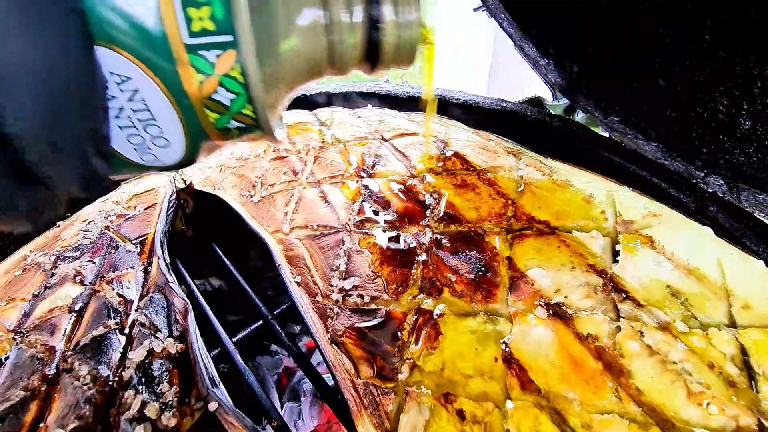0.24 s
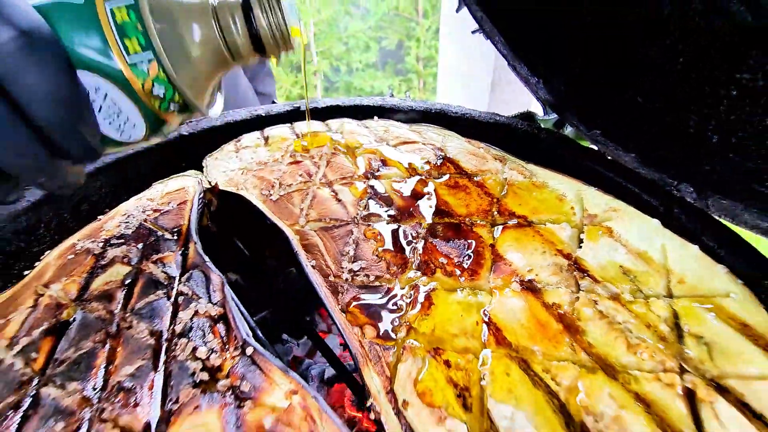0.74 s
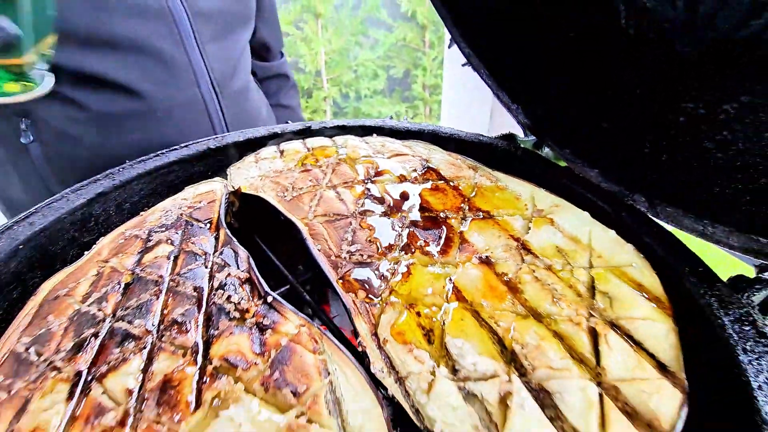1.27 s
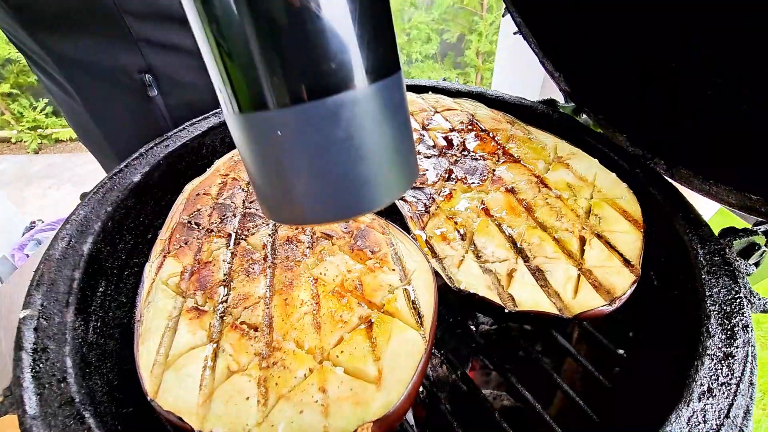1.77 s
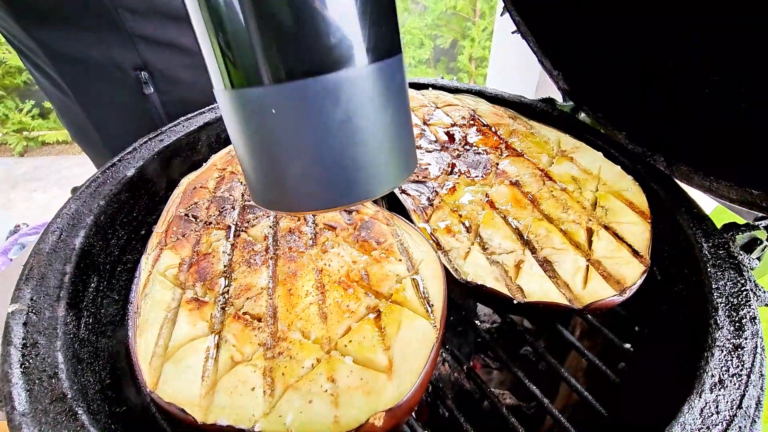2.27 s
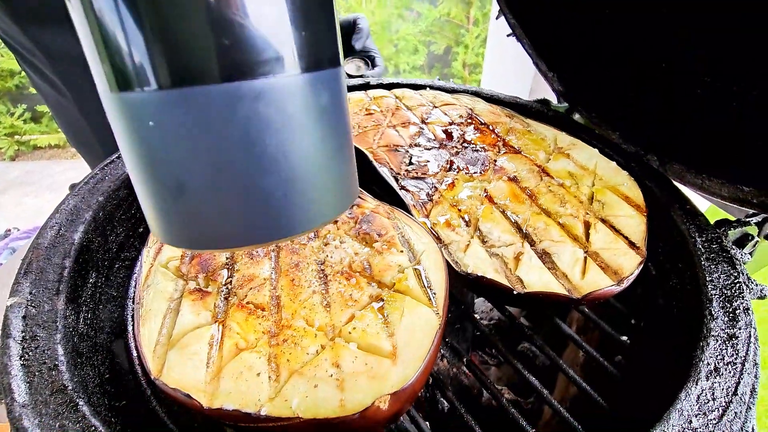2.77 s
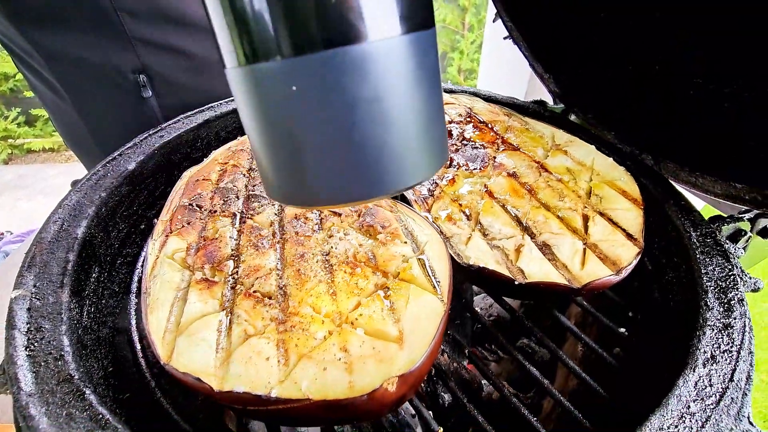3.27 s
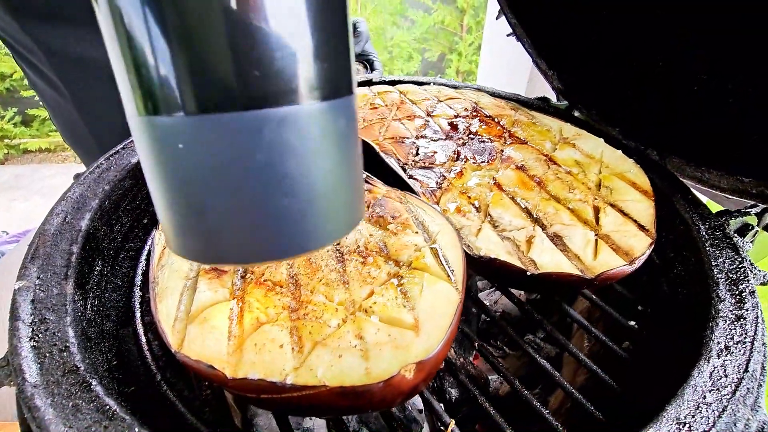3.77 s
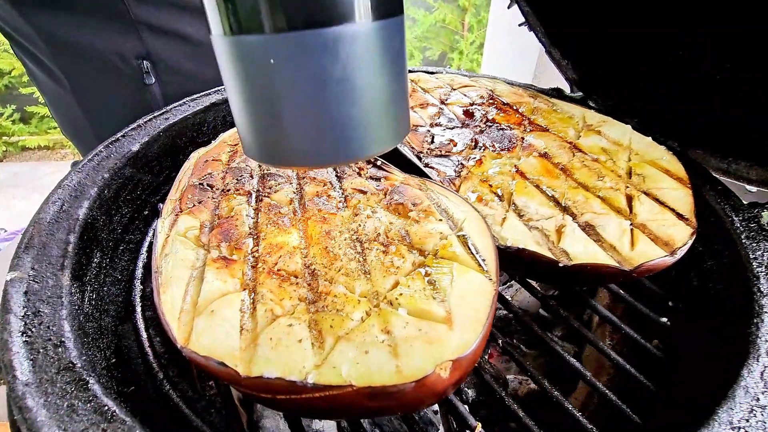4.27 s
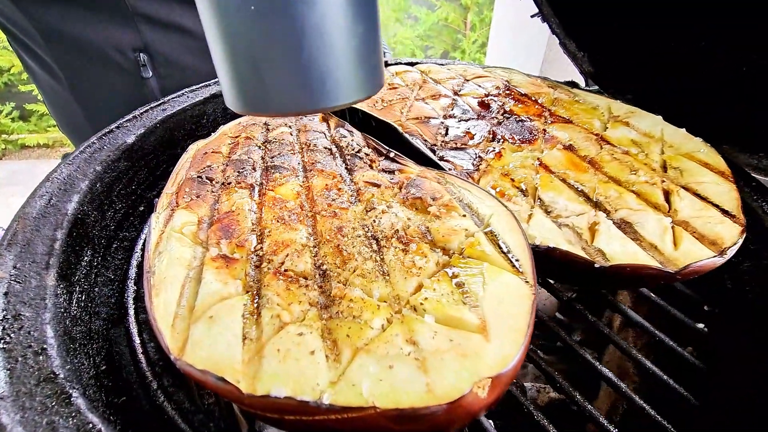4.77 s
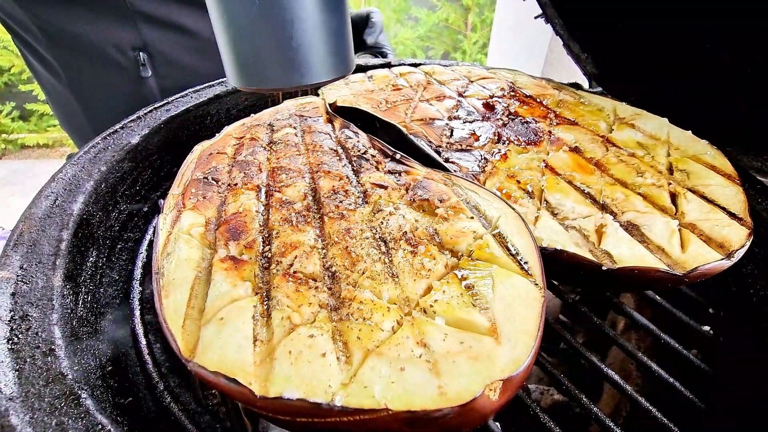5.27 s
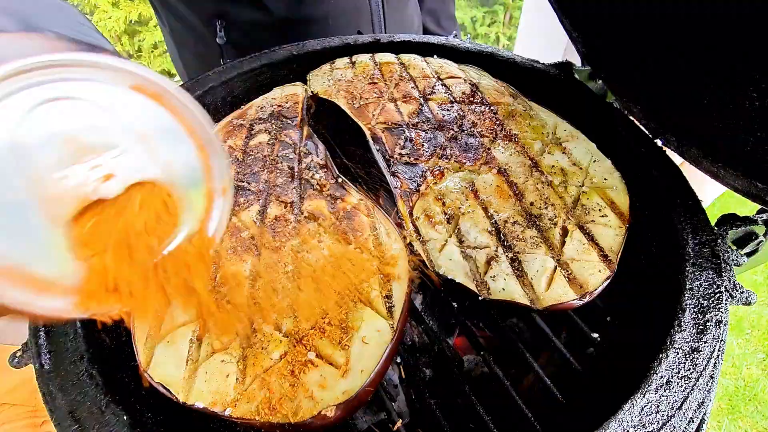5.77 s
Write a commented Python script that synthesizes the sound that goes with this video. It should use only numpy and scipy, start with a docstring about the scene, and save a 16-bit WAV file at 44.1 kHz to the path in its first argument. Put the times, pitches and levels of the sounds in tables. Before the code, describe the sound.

Outdoors by an open grill, soft low air and rumble come first, with a faint tick. A small electric pepper mill then switches on sharply, its whining motor, plastic gear rattle and crisp grinding rasp running steadily for over four seconds. Peppercorns crack in brief snaps, and the pitch dips as the burr bites. It stops abruptly, leaving faint sizzle and a light click. Close microphone, dry.

```python
"""Pepper mill over a grill

A battery pepper mill runs for a little over four seconds above an open charcoal grill in a garden.
Its motor whines in tones locked to a shaft that sags under load; tooth clicks rattle the plastic housing.
Clumps of tiny snaps make the rasp of the burr, and short bursts of noise are corns cracking.
Around it, filtered noise gives a low rumble, fine clicks a faint sizzle, damped rings a few light ticks."""
import sys
import numpy as np
from scipy import signal
from scipy.fft import rfft, irfft
from scipy.io import wavfile
from scipy.ndimage import uniform_filter1d

SR = 44100
rng = np.random.default_rng(int(sys.argv[2]) if len(sys.argv) > 2 else 0)


def log_audio(samples):
    """Write samples as a 16-bit WAV file to the path given in sys.argv[1]."""
    # one column per channel
    frames = np.atleast_2d(samples).T
    # limit to full scale, then quantise
    limited = np.clip(frames, -1, 1)
    pcm = np.round(limited * 32767).astype(np.int16)
    wavfile.write(sys.argv[1], SR, pcm)


N = 266364
T = np.arange(N) / SR  # time of every sample, s


def amp(db):
    """Turns decibels into a plain multiplier."""
    return 10 ** (np.asarray(db) / 20)


def unit(x):
    """Scales a sound to an average strength (rms) of 1."""
    return x / np.sqrt(np.mean(x ** 2) + 1e-20)


def curve(rows, axis=1):
    """Draws straight lines through one column of a table of times."""
    rows = np.asarray(rows)
    return np.interp(T, rows[:, 0], rows[:, axis])


def colour(x, points):
    """Gives a sound the listed spectrum, with a filter of energy 1 that never rings ahead of its input."""
    size = 8192
    hz, db = np.transpose(points)
    log_hz = np.log(abs(np.fft.fftfreq(size, 1 / SR)) + 1)
    log_gain = np.log(amp(np.interp(log_hz, np.log(hz), db)))
    minimum_phase = np.exp(np.conj(signal.hilbert(log_gain)))
    taps = np.fft.ifft(minimum_phase).real[:size // 2]
    return signal.oaconvolve(x, taps / np.linalg.norm(taps))[:len(x)]


def wander(hz):
    """Random drift of rms 1 whose movements weaken above the given rate."""
    f = np.fft.rfftfreq(N, 1 / SR)
    spectrum = rfft(rng.standard_normal(N)) / (1 + (f / hz) ** 2)
    return unit(irfft(spectrum, N))


def ring(x, hz, width):
    """A fixed resonance: it answers most strongly near one frequency."""
    b, a = signal.iirpeak(min(hz, SR / 2 - 1), hz / width, SR)
    return signal.lfilter(b, a, x)


def double_ring(x, hz, width):
    """The same resonance twice in a row, for steeper sides, at rms 1."""
    return unit(ring(ring(x, hz, width), hz, width))


def grains(per_s, spread_db):
    """Random clicks of uneven size and either sign."""
    size = amp(spread_db * np.minimum(rng.exponential(1, N), 4))
    sign = rng.choice([-1, 1], N)
    return size * sign * (rng.random(N) < per_s / SR)


def patches(x, db, count):
    """The colour flickers in patches about 500 Hz wide and count frames of 1.5 ms long."""
    z = signal.stft(x, nperseg=256, noverlap=192)[2]
    field = rng.standard_normal(z.shape)
    for axis, size in enumerate([3, count]):  # across frequency, then along time
        field = uniform_filter1d(uniform_filter1d(field, size, axis), size, axis)
    flickering = z * amp(db * unit(field))
    return unit(signal.istft(flickering, nperseg=256, noverlap=192)[1][:len(x)])


# colour of the wash of outdoor air: [f/Hz, relative level/dB]
AIR_COLOUR = [(60, 1), (100, -11.5), (200, -12.5), (320, -11), (450, -14), (600, -12.5), (780, -17),
              (1000, -19.5), (1250, -30.5), (1700, -37.5), (2500, -50), (5000, -89.5)]
# rise and fall of the rumble, before its trim: [t/s, level/dB]
RUMBLE_LEVEL = [(0, -61.5), (.63, -69), (.7, -57), (1.4, -63.5), (1.7, -57), (3.55, -53), (4.3, -59),
                (5.8, -60.5), (5.95, -68.5)]
# colour of the rumble: [f/Hz, relative level/dB]
RUMBLE_COLOUR = [(25, -26), (40, -17), (58, -3), (72, -2.5), (86, 1.5), (105, -4), (130, -3), (200, -5.5),
                 (300, -25), (600, -59.5)]
# colour of the sizzle: [f/Hz, relative level/dB]
SIZZLE_COLOUR = [(1200, -30), (2000, -11.5), (3200, -10), (4900, -6), (6200, -11), (8000, -14.5),
                 (12000, -12), (14000, -9), (15200, -2), (15800, -3.5)]
# rise and fall of the sizzle: [t/s, level/dB]
SIZZLE_LEVEL = [(0, -71.5), (1.44, -70), (5.82, -59), (6.04, -67)]
AIR_DB, AIR_FALL_DB_PER_S = -59.5, 0.36  # wash at the beginning, and how fast it eases


def garden(rumble_trim_db=-1, low_edge_hz=170):
    """Distant wash and lumpy rumble from noise, with fine clicks for the sizzle of oil on the grill."""
    high_pass = signal.butter(2, low_edge_hz, "high", fs=SR, output="sos")
    wash = signal.sosfilt(high_pass, colour(rng.standard_normal(N), AIR_COLOUR))
    air = amp(AIR_DB - AIR_FALL_DB_PER_S * T + 1.5 * wander(3.4)) * unit(wash)
    rumble = amp(curve(RUMBLE_LEVEL) + rumble_trim_db) * colour(rng.standard_normal(N), RUMBLE_COLOUR)
    spits = patches(grains(12000, 2.2), 2.3, count=40)
    sizzle = amp(curve(SIZZLE_LEVEL)) * colour(spits, SIZZLE_COLOUR)
    return air + rumble + sizzle


# light handling ticks: [t/s, level/dB, f/Hz, width of each resonance/Hz, time to fade by 60 dB/s]
TICKS = [(.955, -67, 2460, 200, .16), (.955, -63, 3500, 1700, .07), (.96, -73, 3250, 1100, 0.86),
         (1.037, -67, 14500, 3000, .1), (5.899, -57, 6800, 2500, .015), (5.9111, -47, 6830, 2500, 0.0062),
         (5.9113, -47, 13000, 5000, .005), (5.914, -63, 6400, 1800, .12), (5.94, -66, 6500, 2500, .015)]


def ticks():
    """Short damped rings of things handled beside the grill, made from narrow noise."""
    out = np.zeros(N)
    for s, db, hz, width, t60 in TICKS:
        fading_db = db - 60 * np.maximum(T - s, 0) / t60
        out += (T >= s) * amp(fading_db) * double_ring(rng.standard_normal(N), hz, width)
    return out


# peppercorns that break: [t/s, level/dB, length of the fracture/s, pitch of the snap f/Hz]
CRACKS = [(2.1554, -19.5, .0012, 7590), (2.3094, -16.8, .0011, 3400), (2.3123, -21.5, 0.00078, 1200),
          (2.4977, -18.5, .0014, 2600), (2.5006, -17.5, 0.00098, 4700), (3.8953, -16.7, .002, 5000),
          (3.8968, -21, 0.00099, 1100), (4.3944, -16.5, .0013, 3900), (4.3967, -24, .001, 2000),
          (5.2673, -19.5, 0.00069, 4600), (5.4901, -18.3, .0012, 4700), (5.4923, -23, 0.00099, 7300)]
# colour of the breaking burst: [f/Hz, relative level/dB]
CRACK_COLOUR = [(300, -24), (900, -8), (2400, -0.5), (3400, -8.5), (4900, 1.5), (5900, -4.5), (7800, -1.5),
                (9700, -4), (12200, 0.5), (14000, -7), (15400, -3)]


def cracks(tail_db=-13, tail_s=0.0066, snap_db=-6, snap_width_hz=900, echo_db=-13, echo_s=0.0067):
    """A corn splits in a brief burst with its own pitch; crumbs follow and a nearby surface throws it back."""
    age, out = T[:SR // 20], np.zeros(N)
    for s, db, length, hz in CRACKS:
        fracture = np.exp(-(age / length) ** 4)
        crumbs = amp(tail_db) * np.exp(-age / tail_s)
        force = amp(db) * (fracture + crumbs)
        burst = colour(force * rng.choice([-1, 1], len(age)), CRACK_COLOUR)
        snap = ring(force * rng.choice([-1, 1], len(age)), hz, snap_width_hz)
        snap *= np.sqrt(SR / np.pi / snap_width_hz)  # makes up for the narrow band
        crack = (burst + amp(snap_db) * snap) / np.hypot(1, amp(snap_db))
        out[round(s * SR):][:len(age)] += crack
    return out + amp(echo_db) * np.interp(T - echo_s, T, out)


ON, OFF = 1.4445, 5.803  # the motor runs between these times, s


def motor_switch(start_s=0.0072, stop_s=0.009):
    """The motor's sound ramps up from 0 to 1 as it starts and back down as it stops."""
    rise = np.clip((T - ON) / start_s + .5, 0, 1)
    fall = np.clip((OFF - T) / stop_s + .5, 0, 1)
    return rise * fall


# how far the mill is drawn back: [t/s, share 0 to 1]
DRAWN_BACK = [(1.4, 0.3), (1.8, 0.06), (3.7, 0.03), (4.1, 0.9), (5.0, 1), (5.8, 0.99)]


def drawn_back():
    """The mill's place over time: 0 held close, 1 drawn back."""
    return np.clip(curve(DRAWN_BACK), 0, 1)


# the burr bites on corns until they give way:
# [t of giving way/s, build-up/s, drag on the shaft/Hz, extra noise level/dB]
BITES = [(1.525, .09, 28.8, 4), (1.571, .04, 9.1, 3.5), (1.743, .124, 8.5, 1.7), (1.93, .04, 3, 1),
         (2.025, .14, 13.7, 2), (2.127, .062, 10.2, 1.5), (2.31, 0.065, 17.9, 2), (2.51, 0.076, 20.2, 3.6),
         (2.637, .12, 5.4, 1.5), (2.793, 0.057, 0.51, 0.5), (3.15, .12, 12.7, 1.2),
         (3.358, 0.087, 15.3, 1.3), (3.87, .08, 13, 2.5), (3.975, .1, 24.8, 3), (4.286, 0.12, 11.3, 1.5),
         (4.407, 0.064, 17, 3.5), (4.523, .057, 3.95, 2), (4.68, .14, 13, 0.9), (4.85, .11, 10.8, .6),
         (4.98, 0.099, 13, 0.8), (5.138, .115, 27.1, 2.5), (5.342, .127, 16.5, 2), (5.475, .115, 23.3, 3.3),
         (5.75, .2, 4.07, 0.4)]
FREE_HZ, INERTIA_S = 275.3, .05  # turns per s of the unloaded shaft; lag of its speed behind the load
RELEASE_S = .029  # the force of a bite dies away this fast


def bites():
    """Each bite builds and lets go; gives the shaft speed, which sags a little later, and the extra noise."""
    drag, extra_db = np.zeros(N), np.zeros(N)
    for s, build, drag_hz, db in BITES:
        force = np.exp(-np.where(T < s, ((T - s) / build) ** 2, (T - s) / RELEASE_S))
        drag += drag_hz * force
        extra_db += db * force
    keep = np.exp(-1 / (INERTIA_S * SR))
    lagging_drag = signal.lfilter([1 - keep], [1, -keep], drag)
    return FREE_HZ - lagging_drag, extra_db


# levels between bites as the mill is moved about, before each part's trim:
# [t/s, gear rattle level/dB, burr rasp level/dB, gear strain level/dB]
BETWEEN_BITES = [(1.445, -35.7, -34.5, -46), (2.0, -35.5, -34, -43.5), (2.8, -35.0, -32, -40.5),
                 (3.6, -35, -32.9, -42), (4.05, -36, -33.5, -43), (4.3, -36.9, -32.5, -42.5),
                 (4.9, -36, -33, -41.5), (5.4, -38, -35.5, -43.5), (5.78, -37.5, -34, -46)]
BURR_GROWTH, STRAIN_GROWTH = 0.83, 2.15  # dB of rasp and of gear strain per dB of extra noise


def working_levels(extra_db):
    """Rattle, rasp and strain all grow with a bite, each at its own rate."""
    rattle_db = curve(BETWEEN_BITES) + extra_db
    rasp_db = curve(BETWEEN_BITES, axis=2) + BURR_GROWTH * extra_db
    strain_db = curve(BETWEEN_BITES, axis=3) + STRAIN_GROWTH * extra_db
    return rattle_db, rasp_db, strain_db


# colour of the burr in its chute with the mill held close: [f/Hz, relative level/dB]
CHUTE_NEAR = [(1500, -25), (3100, -4.5), (4900, -9), (5800, -16), (6900, -6.5), (7600, -2.5), (8700, 0.5),
              (9700, -10.5), (11200, -7.5), (12700, -2.5), (13950, -8), (14900, 1), (15700, 1)]
# the same with the mill drawn back: [f/Hz, relative level/dB]
CHUTE_FAR = [(1500, -28.5), (3100, -15.5), (4500, -5), (5500, -2), (6600, -4), (7500, -1.5), (8700, -0.5),
             (9700, -6), (10700, -3), (11500, -4.5), (12900, -0.5), (13950, -8), (14900, 4.5), (15700, 2.5)]


def burr(turns, rasp_db, back, trim_db=0.5, depth=0.11, clump_db=0.6, patchy_db=1.3):
    """Pepper crumbles between the cones in clumps of tiny snaps that sound through the chute."""
    once_a_turn = np.exp(depth * np.cos(2 * np.pi * turns))
    snaps = unit(grains(11000, 2.0) * once_a_turn * amp(clump_db * wander(83)))
    snaps = patches(snaps, patchy_db, count=24)
    near, far = colour(snaps, CHUTE_NEAR), colour(snaps, CHUTE_FAR)
    return amp(rasp_db + trim_db) * ((1 - back) * near + back * far)


# colour of the treble layer that differs between left and right: [f/Hz, relative level/dB]
TREBLE_COLOUR = [(3500, -61), (5000, -23), (6200, 5), (8200, -11), (10500, 4), (14000, -2.5), (15500, 1.5)]


def treble_difference(rasp_db, back, running, grain_db=-12, crack_db=-10):
    """Separate treble grains and crack bursts, opposite in left and right, fading out as back rises to 1."""
    treble_grains = running * amp(rasp_db + grain_db) * colour(unit(grains(11000, 2.4)), TREBLE_COLOUR)
    crack_bursts = amp(crack_db) * colour(cracks(), TREBLE_COLOUR)
    return (1 - back) * (treble_grains + crack_bursts)


def knocks(turns, scatter_db):
    """One uneven knock each turn."""
    new_turn = np.diff(np.floor(turns), prepend=0) > 0
    size = amp(scatter_db * rng.standard_normal(N))
    return unit(new_turn * size * rng.choice([-1, 1], N))


def chatter(turns, depth=0.18, knock=.14, second_knock=0.17):
    """Dense tooth clicks that swell once a shaft turn, with knocks from shaft and gear wheel."""
    wheel_turns = 1.512 * turns
    clicks = unit(grains(12000, 1.4) * np.exp(depth * np.cos(2 * np.pi * turns)))
    return unit(clicks + knock * knocks(turns, 4.7) + second_knock * knocks(wheel_turns, 3))


# colour of the plastic housing struck by the gears: [f/Hz, relative level/dB]
HOUSING = [(100, -24), (250, -15), (400, -12.5), (600, -11.5), (850, -4), (1150, -2.5), (1500, -1.5),
           (1900, -3.5), (2250, -2.5), (2700, -4.5), (3400, -3), (4700, -1.5), (5700, -11), (8000, -24)]
# housing resonances that ring as the load rises: [f/Hz, half the width of each resonance/Hz, relative level/dB]
STRAIN = [(1917, 320, -2.5), (4250, 500, -6)]


def gears(turns, rattle_db, strain_db, rattle_trim_db=-1.15, strain_trim_db=-5.5, patchy_db=1.5):
    """The chatter shakes the housing, whose resonances ring harder as the load rises."""
    drive = chatter(turns)
    ringing = unit(sum(amp(db) * double_ring(drive, hz, 2 * width) for hz, width, db in STRAIN))
    body = patches(colour(chatter(turns), HOUSING), patchy_db, count=60)
    return amp(rattle_db + rattle_trim_db) * body + amp(strain_db + strain_trim_db) * ringing


FOOD_ECHO_DB = -14.5
ECHO_S, ECHO_LIFT_S = 0.000989, .0005  # delay held close; added delay when fully drawn back


def food_echo(grinding, back):
    """The food below throws the grinding back, later when the mill is drawn back."""
    return amp(FOOD_ECHO_DB) * np.interp(T - ECHO_S - ECHO_LIFT_S * back, T, grinding)


# harsh bands as the mill starts, from the brushes and the gear teeth:
# [f/Hz, width of each resonance/Hz, level/dB, length/s]
START_UP = [(15200, 2200, -37, .07), (4300, 750, -38, .13)]


def start_up():
    """The brushes fizz and the teeth scrape, as bands of noise, while the motor takes up the first load."""
    out = np.zeros(N)
    for hz, width, db, length in START_UP:
        fade = np.exp(-((T - ON) / length) ** 4)
        out += amp(db) * fade * double_ring(rng.standard_normal(N), hz, width)
    return out


def whine(tones, turns, excess, back, flutter=0.25, slop=0.04):
    """Tones locked to the shaft, each at its own phase; play in the bearings blurs them a little."""
    out = np.zeros(N)
    for multiple, db, growth, back_db in tones:
        blur = slop * np.sqrt(multiple / 5) * wander(15)
        phase = multiple * turns + rng.random() + blur  # in cycles
        strength = amp(db + growth * excess + back_db * back) * (1 + flutter * wander(22))
        out += strength * np.sin(2 * np.pi * phase)
    return np.sqrt(2) * out


# tones of the meshing gears: [multiple of the shaft rate, relative level/dB,
# growth/dB per 1% of speed, change when drawn back/dB]
MESH_TONES = [(6.41, -8, .21, -1.5), (7, -10.5, 0.62, -2), (7.07, -8, -0.36, 3), (7.28, -14.5, -.3, 1),
              (7.7, -9, -.3, -2), (12.12, -14.5, -.1, -2), (14.14, -14.5, 0, 0), (15.15, -10.5, -.14, 0.5),
              (16.7, -9, -.3, -0.5)]


def mesh(turns, excess, back, strain_db, trim_db=-2.5):
    """The meshing gears sound tones at fixed multiples of the shaft rate, louder with the load."""
    return amp(strain_db + trim_db) * whine(MESH_TONES, turns, excess, back, flutter=0.43)


# lesser tones of the motor: [multiple of the shaft rate, relative level/dB,
# growth/dB per 1% of speed, change when drawn back/dB]
MOTOR_TONES = [(1 / 3, -21.5, 0, -5), (1, -14.5, 0.5, -1.5), (2, -25, 0.5, -1), (4, -10, -0.14, 1),
               (6, -6, 0.45, -0.5), (9, -6.5, -0.5, -7), (11, -12.5, 1, -3)]
# the two leading tones, before their trim: [t/s, third harmonic level/dB, fifth harmonic level/dB]
LEADING_LEVELS = [(1.46, -42.5, -43), (1.65, -44.5, -39.7), (1.85, -50.5, -43), (2, -43, -37.5),
                  (2.2, -50, -43), (2.45, -46.5, -41), (2.58, -52.5, -45), (2.8, -43, -46), (3, -45.5, -45),
                  (3.2, -48, -43), (3.5, -42.5, -43.5), (3.9, -46, -46), (4.2, -51, -42),
                  (4.48, -56.5, -45.5), (4.7, -47, -43), (5.25, -45.5, -42.5), (5.49, -59, -46),
                  (5.6, -46.5, -44)]
# which harmonics lead: [multiple of the shaft rate]
LEADING = [3, 5]


def motor(turns, excess, back, lesser_db=-41, leading_trim_db=-0.5):
    """The spinning motor whines at multiples of its shaft rate, two of them leading."""
    out = amp(lesser_db) * whine(MOTOR_TONES, turns, excess, back, flutter=0.28)
    for column, multiple in enumerate(LEADING, 1):
        level = amp(curve(LEADING_LEVELS, axis=column) + leading_trim_db)
        out += level * whine([(multiple, 0, 0, 0)], turns, excess, back)
    return out


NOMINAL_HZ = 267  # shaft rate from which the growth of the tones is counted


def scene(uneven_db=0.39):
    """The mill in the middle over the food; a treble layer of opposite sign in left and right is added."""
    speed, extra_db = bites()
    extra_db = extra_db + uneven_db * wander(20)
    turns = np.cumsum(speed * (1 + .002 * wander(30))) / SR
    excess = 100 * (speed / NOMINAL_HZ - 1)  # percent above the nominal rate
    back, running = drawn_back(), motor_switch()
    rattle_db, rasp_db, strain_db = working_levels(extra_db)
    grinding = running * (gears(turns, rattle_db, strain_db) + burr(turns, rasp_db, back))
    tones = motor(turns, excess, back) + mesh(turns, excess, back, strain_db)
    mill = running * (tones + start_up()) + grinding + food_echo(grinding, back)
    middle = garden() + ticks() + cracks() + mill
    difference = treble_difference(rasp_db, back, running)
    return middle + np.array([difference, -difference])  # left and right


EDGE_HZ = 15790


def record(dry):
    """Limits the band: weakens what lies below 38 Hz and cuts steeply above the upper edge."""
    no_sub = signal.sosfilt(signal.butter(2, 38, "high", fs=SR, output="sos"), dry)
    low_pass = signal.firwin(1601, EDGE_HZ, window=("kaiser", 8), fs=SR)
    return signal.oaconvolve(no_sub, low_pass[None], "same")


dry = scene()
out = record(dry)
log_audio(out)
```